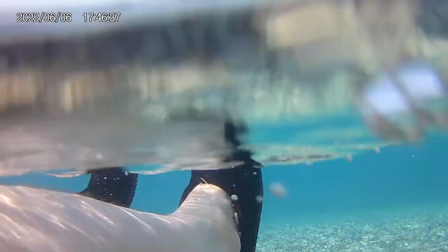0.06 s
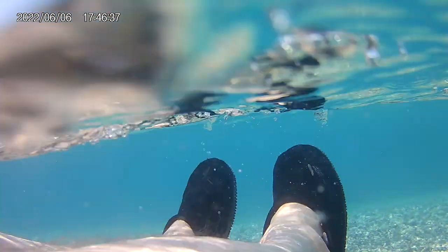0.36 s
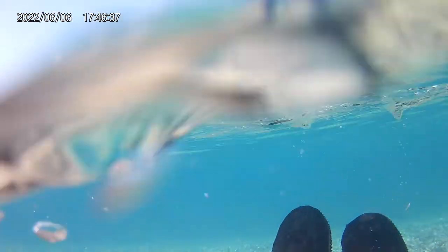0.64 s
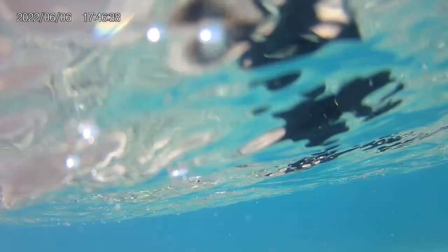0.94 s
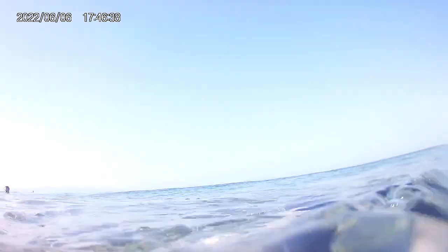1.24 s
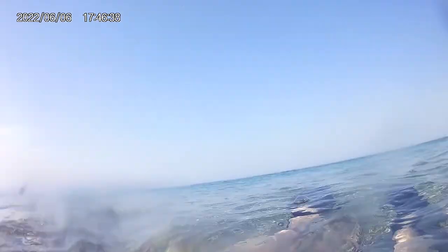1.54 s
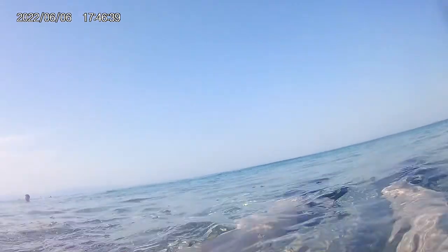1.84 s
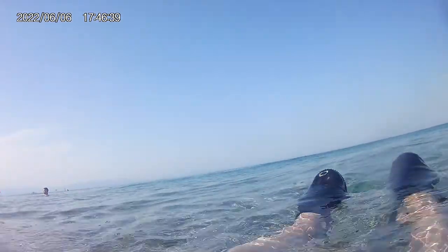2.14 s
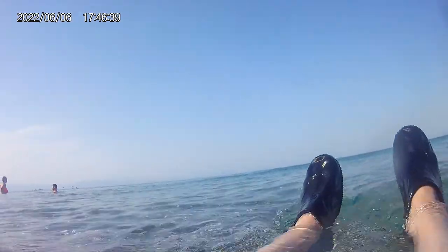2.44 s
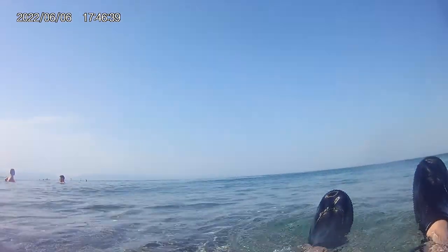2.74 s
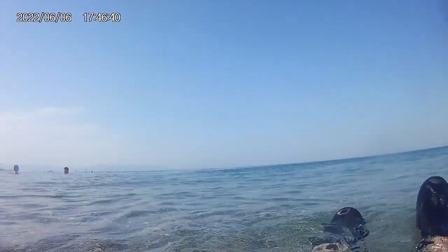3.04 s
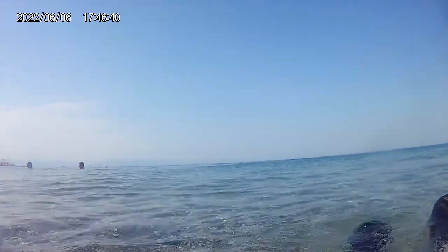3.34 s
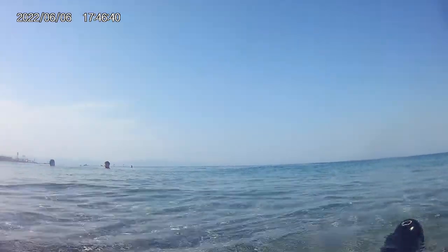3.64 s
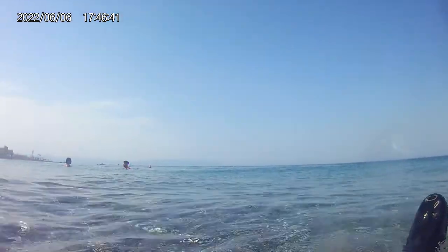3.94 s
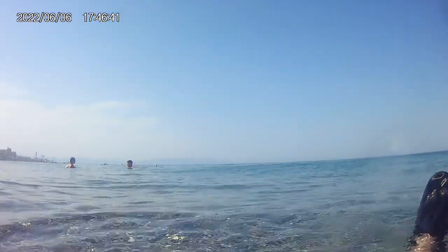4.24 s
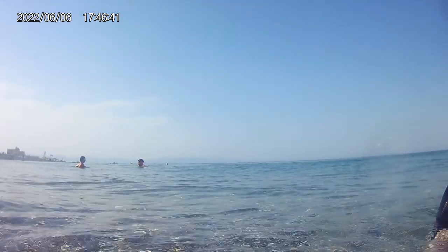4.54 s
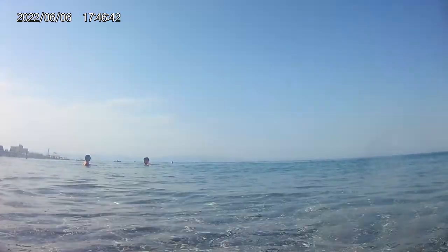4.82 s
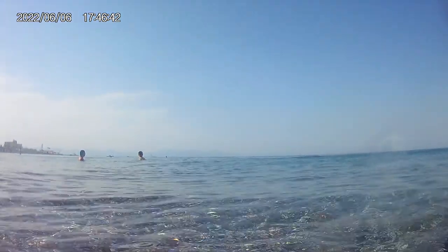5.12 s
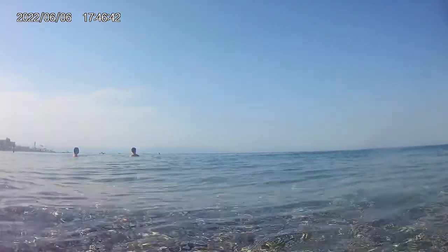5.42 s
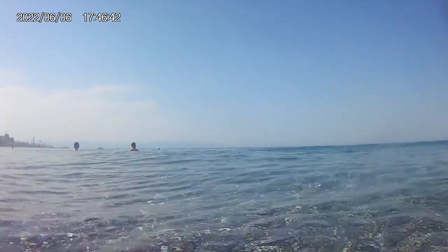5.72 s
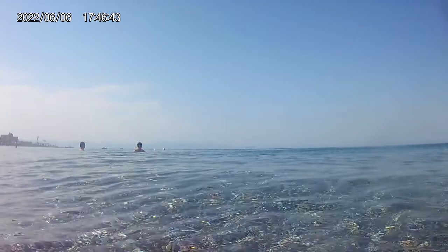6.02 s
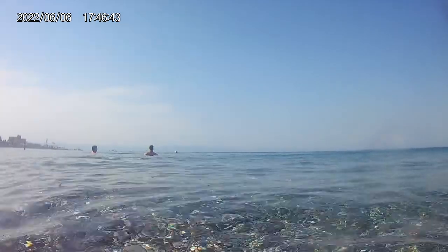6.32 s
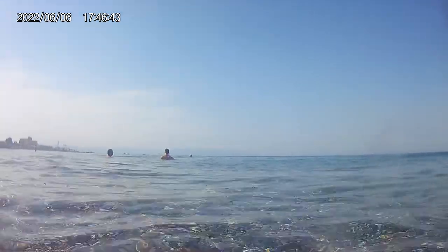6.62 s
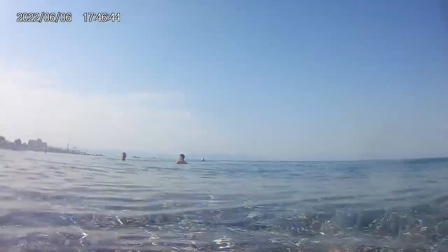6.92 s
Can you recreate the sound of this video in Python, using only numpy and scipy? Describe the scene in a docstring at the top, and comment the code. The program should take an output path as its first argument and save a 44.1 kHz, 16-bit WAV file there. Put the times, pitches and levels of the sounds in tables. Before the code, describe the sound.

Sea water splashes and bubbles over a submerged camera, then drains away as it surfaces, leaving light drips and faint small waves.

```python
"""Trapped bubbles plop against a waterproof camera case as the sea slaps and closes over it.
Each bubble rings at the pitch of its size; each slap rings the case and squeezes an air pocket.
At about 1.4 s the case surfaces and drains. Drops tick on it, feet send a ripple past, and small waves
wash faintly over beach pebbles. All is heard through the case, whose resonances differ in water and air."""
import sys
import numpy as np
from scipy import signal
from scipy.fft import rfft, irfft, next_fast_len
from scipy.io import wavfile
from scipy.ndimage import map_coordinates

SR = 44100
rng = np.random.default_rng(int(sys.argv[2]) if len(sys.argv) > 2 else 0)


def waveform_to_disk(signal):
    """Save audio, clipped to [-1, 1], as 16-bit WAV at the path in sys.argv[1]."""
    frames = np.transpose(np.atleast_2d(signal))
    scaled = np.clip(frames, -1, 1) * 32767
    samples = np.round(scaled).astype(np.int16)
    wavfile.write(sys.argv[1], SR, samples)


N = 316197

# large bubbles: (time [s], level [dB], pitch [Hz], glide [oct])
BUBBLES = [(0.5316, -43, 1340, -.07), (.651, -45, 2630, 0), (0.658, -46.5, 3700, -0.17),
           (.666, -41.5, 1850, -0.41), (.6765, -42, 676, .1), (0.6975, -36, 920, 0.38),
           (.7715, -33, 664, -0.27), (.784, -31, 409, 0), (.8287, -30.5, 873, .17),
           (.8452, -16, 2046, -0.056), (0.8468, -29, 2540, 0), (.869, -29.5, 702, -.05),
           (.869, -36, 5030, 0), (.8802, -41.5, 554, -0.014), (0.958, -33, 1640, -0.14),
           (0.9716, -36.5, 1700, -0.15), (1.154, -48.5, 1854, -.1), (1.402, -45, 1650, 0),
           (1.475, -47, 1160, 0.25), (1.81, -56.5, 434, .3), (2.4915, -41.5, 2010, -0.021),
           (2.62, -55, 980, .2), (3.0, -54.5, 1770, -.28), (3.112, -56, 1290, .2),
           (5.792, -49.5, 1960, 0.049), (6.94, -58, 1960, 0)]
# slaps: (time [s], level [dB], cutoff [Hz], t60 [s], pocket pitch [Hz], pocket level [dB])
SLAPS = [(.2455, -53, 3640, 0.0068, 2200, -62), (0.6966, -38, 4000, 0.014, 4000, -41.5),
         (0.7251, -23.5, 2680, 0.024, 1886, -17), (0.7305, -26.5, 4630, 0.012, 640, -27),
         (.7655, -30.5, 4300, 0.015, 2970, -27), (.7852, -16, 1425, 0.011, 1580, -13.5),
         (.8372, -26, 3400, 0.013, 3900, -29), (.8446, -13, 2450, 0.019, 1160, -15.5),
         (0.8684, -23, 7240, 0.019, 5800, -38), (0.9313, -28.5, 4760, 0.006, 4300, -41.5),
         (0.9591, -31.5, 2620, 0.04, 2260, -28), (1.558, -44, 3620, 0.033, 2430, -52)]
# dull bumps on the case: (time [s], level [dB], pitch [Hz])
BUMPS = [(0.732, -32, 161), (0.931, -36, 280), (0.9575, -35.5, 340), (1.099, -58, 137), (1.108, -42.5, 152),
         (1.558, -42, 330), (2.375, -46, 150), (6.605, -45, 79), (7.094, -49.5, 51)]
# tiny bubbles bursting: (time [s], level [dB])
SNAPS = [(0.3428, -36), (0.7318, -39), (0.869, -36), (1.39, -34)]
# drops on the case: (time [s], level [dB], splash pitch [Hz], splash re knock [dB])
DROPS = [(1.614, -37.5, 2660, -0.5), (1.751, -41, 1660, -11), (2.377, -44, 2070, 2), (3.162, -40, 1753, -2),
         (3.741, -44, 1870, -4), (4.117, -39, 5670, -1.5), (4.377, -41.5, 1865, -5), (4.920, -40, 1920, 4),
         (4.958, -52, 1300, 20), (5.492, -44, 1820, -4), (5.885, -50, 1260, -7), (6.112, -41.5, 1930, 7),
         (6.454, -44, 1970, 5), (7.141, -46, 1130, -4)]
# clearest spray droplets: (time [s], level [dB], pitch [Hz])
SPRAY = [(2.596, -57, 4420), (4.376, -60, 5440), (5.744, -58, 3620), (6.749, -58, 4020), (6.829, -53, 3760),
         (7.145, -54, 4100)]
# waves on the beach: (crest [s], level [dB], rise per 20 dB [s])
WAVES = [(3.55, -63.5, .45), (4.27, -62, 1.05), (4.78, -68, 0.38), (6.24, -59, 1.28), (7.12, -69, 0.79)]
# case modes with water against it: (frequency [Hz], width [Hz], gain [dB])
WET_CASE_MODES = [(182, 51, -9), (382, 19, -0.5), (586, 47, 7), (703, 61, 1), (947, 58, -19),
                  (1080, 78, -16), (1450, 86, 6.5), (1800, 210, 4.5), (2480, 150, -26), (3920, 210, 1.5),
                  (4830, 180, -4), (6240, 295, -15), (6940, 510, -9)]
# case modes in air: (frequency [Hz], width [Hz], gain [dB])
DRY_CASE_MODES = [(1060, 82, 13), (1277, 136, 18), (1690, 310, 4), (1928, 45, 8), (3060, 910, -12),
                  (3950, 340, 0.5), (5500, 680, -23)]
# underwater murmur and froth: (frequency [Hz], level [dB])
WATER_SPECTRUM = [(300, -15), (560, 0.5), (740, 3), (950, -10.5), (1230, -15), (1480, -2.5), (1600, -4.5),
                  (1830, 3), (2250, -12), (3100, -11), (3600, -14), (4150, -9), (4750, -16.5), (8200, -24)]
# tiniest bubbles: (frequency [Hz], level [dB])
SIZZLE_SPECTRUM = [(3000, -6), (5600, -22), (6600, -4), (7500, -14), (8200, -39), (8700, -3), (9150, -1.5),
                   (10200, -7), (11500, -4), (12300, -10)]
# foam and droplet crackle: (frequency [Hz], level [dB])
FOAM_SPECTRUM = [(2000, -6), (2600, -24), (3300, -3), (4050, 5.5), (4700, -6.5), (5500, -3), (7400, -12),
                 (9000, -36)]
# trickle in the shell: (frequency [Hz], level [dB])
DRAIN_SPECTRUM = [(250, -10), (450, -4.5), (800, -4), (1050, -7.5), (1210, 4.5), (1420, -7.5), (1800, -6.5),
                  (2500, -15), (3300, -18.5), (4100, -11.5), (4700, -22), (7000, -24.5), (9000, -32)]
# nearby ripple: (frequency [Hz], level [dB])
LAPPING_SPECTRUM = [(400, -28), (800, -14), (1000, -9.5), (1250, 2), (1480, -11), (1720, 2), (2000, -0.5),
                    (2400, -16.5), (3400, -25), (3900, -20), (4800, -34), (7000, -29), (9000, -40)]
# wash over pebbles: (frequency [Hz], level [dB])
SURF_SPECTRUM = [(400, -13.5), (800, -11.5), (1080, -8), (1260, 0.5), (1480, -9), (1660, -6.5), (1960, 4),
                 (2220, -11), (2600, -24.5), (3400, -28), (4050, -27.5), (4700, -39.5)]
# handling rumble: (frequency [Hz], level [dB])
RUMBLE_SPECTRUM = [(15, -6), (30, -3.5), (60, -0.5), (120, -2.5), (250, -6.5), (500, -12), (900, -17.5),
                   (2000, -33.5), (5000, -38.5)]
# microphone hiss: (frequency [Hz], level [dB])
HISS_SPECTRUM = [(100, 2), (2000, 8), (5000, -1.5), (6500, 0), (7500, 2), (8500, -2), (10800, -0.5),
                 (11250, 3.5), (11600, 1), (12300, -13.5)]

# swells: (full at [s], rise per 20 dB [s], hold [s], fall per 20 dB [s])
SURGE = (0.655, 0.08, 0.14, 0.38)  # wave closing over the case
FIZZ_CLOUD = (0.66, 0.64, 0.71, 0.43)  # tiniest bubbles it leaves
FROTH_CLOUD = (1.16, 0.58, 0.25, 0.35)  # small bubbles rising behind it
FILM = (1.36, 0.23, 0.032, 0.35)
TRICKLE = (1.486, 0.32, 0.64, 0.97)
FEET = (2.424, 0.55, 0.13, 0.42)
GRIP = (6.85, 0.33, 0.4, 0.5)

SURFACE_S, BAND_LIMIT_HZ = 1.43, 12250
CALM_CYCLES, VIOLENT_CYCLES, VIOLENT_ABOVE_DB = 82, 36, -33  # cycles per t60
POCKET_T60_S, POCKET_LAG_S, POCKET_GLIDE_OCT = 0.021, 0.0007, 0.089
# STIR levels are relative to the slaps
MURMUR_REST_DB, MURMUR_SURGE_DB, MURMUR_STIR_DB = -65.5, -60, -28.5
FROTH_REST_DB, FROTH_CLOUD_DB, FROTH_STIR_DB = -72.5, -64, -22
FIZZ_REST_DB, FIZZ_CLOUD_DB, FIZZ_STIR_DB = -82, -71, -41.5
CRACKLE_SURGE_DB, CRACKLE_STIR_DB = -66, -37
WAKE_LAG_S, WAKE_GAIN_DB = 0.58, -14.5
WASH_REST_DB = -72.5


def bubbles():
    """Bubbles ring at the pitch of their size, violent ones for fewer cycles; shape wobble varies level."""
    out = np.zeros(N)
    for time_s, db, hz, glide_oct in BUBBLES:
        cycles = VIOLENT_CYCLES if db > VIOLENT_ABOVE_DB else CALM_CYCLES
        add(out, time_s, amp(db) * ping(hz, cycles / hz, attack_s=0.00077, glide_oct=glide_oct))
    return out * amp(1.3 * wobble(rate_hz=380))


def slaps():
    """Water slaps the case, submerged and once just after surfacing; case and air pocket ring briefly."""
    out = np.zeros(N)
    for time_s, db, cutoff_hz, t60_s, pocket_hz, pocket_db in SLAPS:
        ring = resonate(spatter(t60_s, scatter=0.18), WET_CASE_MODES)
        pocket = ping(pocket_hz, POCKET_T60_S, attack_s=0.00036, glide_oct=POCKET_GLIDE_OCT)
        add(out, time_s, amp(db) * unit_peak(lowpass(ring, cutoff_hz)))
        add(out, time_s + POCKET_LAG_S, amp(pocket_db) * pocket)
    return out


def bumps():
    """Dull knocks on the case, damped within a few cycles."""
    out = np.zeros(N)
    for time_s, db, hz in BUMPS:
        add(out, time_s, amp(db) * ping(hz, t60_s=2.6 / hz, attack_s=0.0006))
    return out


def snaps():
    """Tiny bubbles burst on the case: thin, high ticks."""
    out, t = np.zeros(N), event_time(0.02)
    envelope = amp(-60 * t / 0.0034) * (1 - np.exp(-t / 0.00091))
    for time_s, db in SNAPS:
        burst = envelope * rng.standard_normal(len(t))
        add(out, time_s, amp(db) * unit_peak(coloured(burst, SIZZLE_SPECTRUM)))
    return out


def underwater():
    """Surge and slaps stir the water: murmur, gurgling froth, fizz and crackle."""
    sunk = ramp(SURFACE_S - 0.05, SURFACE_S + 0.026, 1, 0)
    slap_swells = (amp(db) * swell(s, rise_s=0.021, hold_s=0, fall_s=0.039) for s, db, *_ in SLAPS)
    stir = sunk * power_sum(*slap_swells)

    def drive(rest, swell_db, shape, stir_db):
        return power_sum(rest, amp(swell_db) * swell(*shape), amp(stir_db) * stir)

    murmur = coloured(patter(rate_hz=1100, spread_db=6, share=0.5), WATER_SPECTRUM)
    murmur *= drive(amp(MURMUR_REST_DB), MURMUR_SURGE_DB, SURGE, MURMUR_STIR_DB)
    froth = coloured(gurgle(count=1500, centre_hz=1941, spread_oct=1.15, cycles=87), WATER_SPECTRUM)
    froth *= drive(amp(FROTH_REST_DB) * sunk, FROTH_CLOUD_DB, FROTH_CLOUD, FROTH_STIR_DB)
    fizz = coloured(patter(rate_hz=2300, spread_db=14, share=0.51), SIZZLE_SPECTRUM)
    fizz *= drive(amp(FIZZ_REST_DB), FIZZ_CLOUD_DB, FIZZ_CLOUD, FIZZ_STIR_DB)
    crackle = coloured(patter(rate_hz=560, spread_db=5, share=0.92), FOAM_SPECTRUM)
    crackle *= drive(0, CRACKLE_SURGE_DB, SURGE, CRACKLE_STIR_DB)
    return sunk * (murmur + fizz + crackle) + froth


def drops():
    """Each drop knocks the case in air, hardest near the pitch of its own brief splash."""
    out = np.zeros(N)
    for time_s, db, hz, splash_db in DROPS:
        force = resonate(spatter(t60_s=0.027, scatter=0.24), [(hz, 1.26 * hz, 0)])
        knock = resonate(force, DRY_CASE_MODES)
        plip = unit_peak(lowpass(knock, cutoff_hz=max(4200, hz)))
        add(plip, 0, amp(splash_db) * ping(hz, t60_s=24 / hz, attack_s=0.0024))
        add(out, time_s, amp(db) * unit_peak(plip))
    return out


def spray():
    """Droplets too fine to ring the whole case: ragged plips, the faintest at random times."""
    out = np.zeros(N)
    faint = rng.uniform((SURFACE_S, -66, 3600), (N / SR, -61, 4500), (14, 3))  # columns as SPRAY
    for time_s, db, hz in [*SPRAY, *faint]:
        force = spatter(t60_s=0.021, scatter=0.12)
        plip = np.convolve(force, ping(hz, t60_s=38 / hz, attack_s=0.00039))
        add(out, time_s, amp(db) * unit_peak(plip))
    return out


def draining():
    """A water film hisses off the surfacing case; a trickle gurgles in a hollow of its shell."""
    drips = patter(rate_hz=400, spread_db=0, share=0.5)
    bubbling = 0.27 * gurgle(count=700, centre_hz=1403, spread_oct=0.68, cycles=51)
    trickle = swell(*TRICKLE) * coloured(drips + bubbling, DRAIN_SPECTRUM)
    runoff = patter(rate_hz=720, spread_db=10, share=0.4)
    film = swell(*FILM) * unit_rms(resonate(runoff, [(4000, 120, 0)]))
    return amp(-61 + 1.4 * wobble(rate_hz=23.86)) * trickle + amp(-71.5) * film


def ripple():
    """Feet break the surface: close lapping and droplets, then a weaker wake as they sink back."""
    full_s, *shape = FEET
    wake = amp(WAKE_GAIN_DB) * swell(full_s + WAKE_LAG_S, *shape)
    flow = power_sum(swell(*FEET), wake)
    splashes = patter(rate_hz=380, spread_db=2, share=0.44)
    bubbling = 0.17 * gurgle(count=600, centre_hz=1670, spread_oct=0.99, cycles=47)
    lapping = coloured(splashes + bubbling, LAPPING_SPECTRUM)
    droplets = amp(-22) * coloured(patter(rate_hz=260, spread_db=9, share=0.94), FOAM_SPECTRUM)
    return flow * amp(-55 + 0.42 * wobble(rate_hz=16)) * (lapping + droplets)


def beach_waves():
    """Small waves roll pebbles over a steady fizz of foam; fades in once the case is in air."""
    in_air = ramp(SURFACE_S, 2.8, 0, 1)
    crests = (amp(db) * swell(s, rise_s, hold_s=0.029, fall_s=0.85) for s, db, rise_s in WAVES)
    flow = power_sum(amp(WASH_REST_DB), *crests)
    pebbles = patter(rate_hz=400, spread_db=6.5, share=0.21)
    bubbling = 0.057 * gurgle(count=350, centre_hz=1680, spread_oct=0.64, cycles=21)
    wash = flow * amp(1.37 * wobble(rate_hz=12)) * coloured(pebbles + bubbling, SURF_SPECTRUM)
    foam = amp(-82.5) * coloured(patter(rate_hz=150, spread_db=10, share=0.15), FOAM_SPECTRUM)
    return in_air * (wash + foam)


def handling_rumble():
    """The hand-held case rumbles, more in the surge and as the grip shifts."""
    sway = power_sum(amp(-64.5), amp(-60.5) * swell(*SURGE), amp(-66.5) * swell(*GRIP))
    return sway * coloured(rng.standard_normal(N), RUMBLE_SPECTRUM)


def microphone_hiss():
    """Steady self-noise."""
    return amp(-73) * coloured(rng.standard_normal(N), HISS_SPECTRUM)


def ping(hz, t60_s, attack_s, glide_oct=0):
    """Damped sine, gliding over its t60; peak 1."""
    t = event_time(t60_s)
    pitch_hz = hz * 2 ** (glide_oct * np.minimum(t / t60_s, 1))
    phase = 2 * np.pi * np.cumsum(pitch_hz) / SR
    onset = 1 - np.exp(-(t / attack_s) ** 2)
    return unit_peak(np.sin(phase) * amp(-60 * t / t60_s) * onset)


def spatter(t60_s, scatter):
    """Force of landing water: one impulse, then a decaying spray of small ones."""
    t = event_time(0.12)
    force = scatter * rng.standard_normal(len(t)) * amp(-60 * t / t60_s)
    force[0] = 1
    return force


def patter(rate_hz, spread_db, share):
    """Tiny uneven impacts in noise; share is their fraction of the power."""
    hits = (rng.random(N) < rate_hz / SR) * rng.choice([-1, 1], N)
    sizes = amp(spread_db * np.minimum(rng.exponential(size=N), np.pi))
    return np.sqrt(share) * unit_rms(hits * sizes) + np.sqrt(1 - share) * rng.standard_normal(N)


def gurgle(count, centre_hz, spread_oct, cycles):
    """Small bubbles of random size and time, each rising slightly in pitch; rms 1."""
    out = np.zeros(N)
    for when, pitch, strength in rng.random((count, 3)):
        hz = centre_hz * 2 ** (spread_oct * (2 * pitch - 1))
        ring = ping(hz, cycles / hz, attack_s=0.00049, glide_oct=0.092)
        add(out, when * N / SR, amp(7 * strength) * ring)
    return unit_rms(out)


def swell(full_s, rise_s, hold_s, fall_s):
    """Gain that rises to 1, holds and falls; 20 dB per rise or fall time."""
    t = np.arange(N) / SR - full_s
    return amp(-20 * (np.maximum(-t, 0) / rise_s + np.maximum(t - hold_s, 0) / fall_s))


def ramp(start_s, end_s, first, last):
    return np.interp(np.arange(N) / SR, (start_s, end_s), (first, last))


def wobble(rate_hz):
    """Smooth curve through random knots."""
    knots = rng.standard_normal(int(N * rate_hz / SR) + 4)
    return map_coordinates(knots, [np.arange(N) * rate_hz / SR])


def resonate(x, modes):
    """Parallel band-passes: (frequency [Hz], width [Hz], gain [dB])."""
    def response(hz):
        return sum(amp(db) * 1j * hz * width_hz / (mode_hz ** 2 - hz ** 2 + 1j * hz * width_hz)
                   for mode_hz, width_hz, db in modes)
    return filtered(x, response)


def coloured(x, spectrum):
    """x shaped by a spectrum, interpolated in log frequency; rms 1."""
    knots_hz, db = np.transpose(spectrum)
    return unit_rms(filtered(x, lambda hz: amp(np.interp(np.log(hz + 1), np.log(knots_hz), db))))


def filtered(x, response):
    size = next_fast_len(len(x) + SR // 10)
    return irfft(rfft(x, size) * response(np.fft.rfftfreq(size, 1 / SR)), size)[:len(x)]


def lowpass(x, cutoff_hz):
    return signal.sosfilt(signal.butter(6, cutoff_hz, fs=SR, output="sos"), x)


def add(track, time_s, sound):
    span = track[round(time_s * SR):][:len(sound)]
    span += sound[:len(span)]


def event_time(length_s):
    """Time axis [s] with a 10 ms tail."""
    return np.arange(int(length_s * SR) + SR // 100) / SR


def power_sum(*gains):
    return np.sqrt(sum(gain ** 2 for gain in gains))


def amp(db):
    return 10 ** (np.asarray(db) / 20)


def unit_rms(x):
    return x / np.sqrt(np.mean(x ** 2) + 1e-20)


def unit_peak(x):
    return x / np.abs(x).max()


def scene():
    """Splash, then quiet shore; mono."""
    splash = bubbles() + slaps() + bumps() + snaps() + underwater()
    shore = drops() + spray() + draining() + ripple() + beach_waves()
    return (splash + shore + handling_rumble() + microphone_hiss())[None]


def record(dry):
    """Camera band limit: brick-wall low-pass."""
    return np.array([filtered(channel, lambda hz: hz < BAND_LIMIT_HZ) for channel in dry])


dry = scene()
out = record(dry)
waveform_to_disk(out)
```